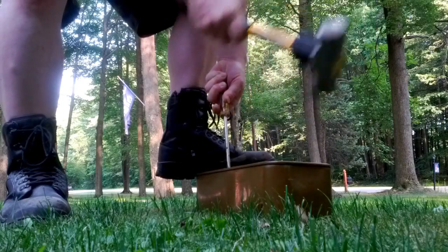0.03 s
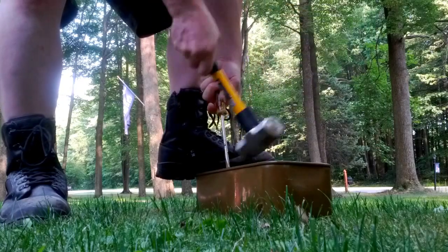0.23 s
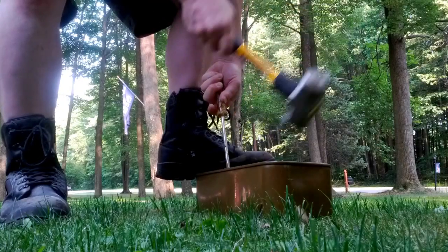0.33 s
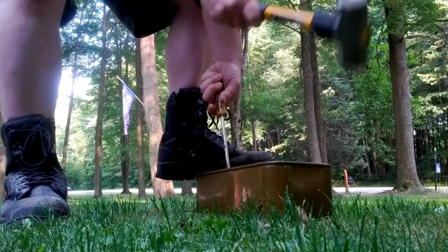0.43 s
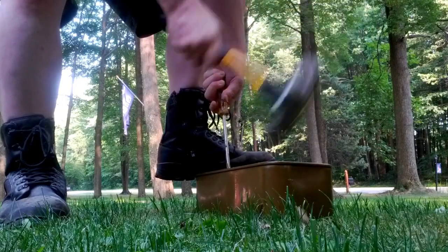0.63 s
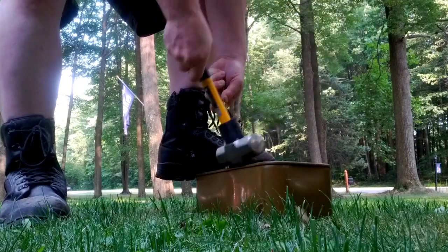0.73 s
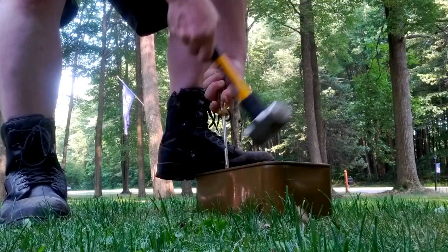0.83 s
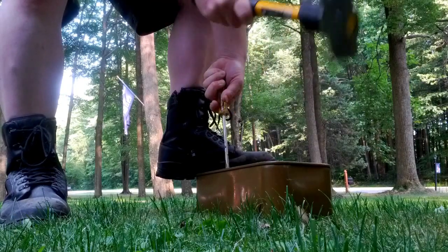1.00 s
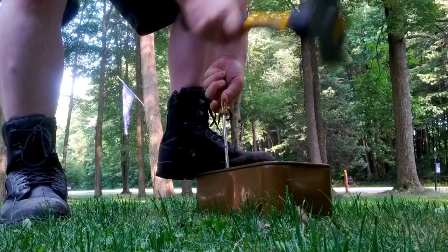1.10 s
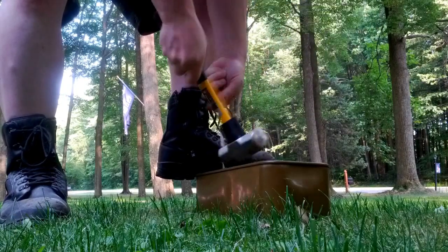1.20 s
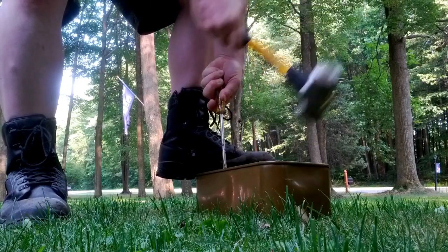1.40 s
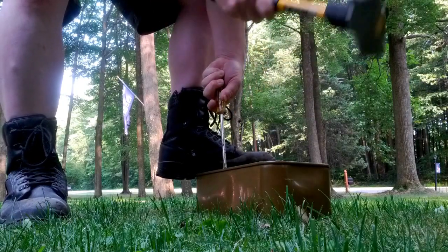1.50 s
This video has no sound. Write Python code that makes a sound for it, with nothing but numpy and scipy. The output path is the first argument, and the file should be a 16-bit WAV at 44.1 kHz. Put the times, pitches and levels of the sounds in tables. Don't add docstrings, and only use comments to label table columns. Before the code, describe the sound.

Hammer blows drive a screwdriver into a metal can lid, three loud overloaded clanks echoing outdoors

```python
import sys
import numpy as np
from scipy import signal
from scipy.io import wavfile
from scipy.ndimage import uniform_filter1d

SR = 44100
rng = np.random.default_rng(int(sys.argv[2]) if len(sys.argv) > 2 else 0)


def unload_audio(sound):
    columns = np.transpose(np.atleast_2d(sound))
    steps = np.round(np.clip(columns, -1, 1) * 32767)
    wavfile.write(sys.argv[1], SR, steps.astype(np.int16))


def how_loud(loudness_db):
    steps = np.asarray(loudness_db, float) / 20
    return 10 ** steps


N = 68355


def evened(x):
    return x / np.sqrt(np.mean(x ** 2) + 1e-20)


def read(points, hz):
    f, value = np.transpose(points)
    return np.interp(np.log(hz + 1), np.log(f + 1), value)


def add(mix, start_s, sound):
    part = mix[round(start_s * SR):][:len(sound)]
    part += sound[:len(part)]


def resonate(x, hz, width_hz):
    turn = np.exp(2j * np.pi * hz * np.arange(len(x)) / SR)
    r = np.exp(-np.pi * width_hz / SR)
    return 2 * (turn * signal.lfilter([1 - r], [1, -r], x / turn)).real


def resonate_twice(x, hz, width_hz):
    return resonate(resonate(x, hz, width_hz), hz, width_hz)


# pitch_hz, width_hz, level_db
STEEL_MODES = [
    [(4090, 210, 2.5), (6406, 390, 13), (8300, 180, -13), (9860, 101, -24), (12200, 590, -2.5),
     (12700, 296, -31.5), (14450, 880, -41)],
    [(4160, 480, 2.5), (6000, 610, 0), (7270, 498, 12), (7450, 210, -2.5), (8450, 230, 2),
     (8900, 280, -25.5), (12700, 960, 5.5)],
    [(4316, 200, -7), (5630, 660, -1.5), (7345, 510, -1), (9210, 610, -22), (10200, 134, -18),
     (12824, 270, 3), (16020, 178, -1)],
]
CONTACT_S, CRACK_T60_S, CRACK_HISS_DB = 0.0018, 0.012, -1.5
SIZZLE_DB, SIZZLE_T60_S, CRACK_TOP_HZ = -19, 0.045, 14900


def crack(crack_db, modes):
    t = np.arange(4000) / SR
    grit, hiss = rng.standard_normal((2, 4000))
    drive = grit * (np.exp(-t / CONTACT_S) + how_loud(SIZZLE_DB - 60 * t / SIZZLE_T60_S))
    ring = sum(how_loud(level_db) * resonate(drive, hz, width_hz) / np.sqrt(width_hz)
               for hz, width_hz, level_db in modes)
    snap = np.diff(hiss, prepend=0) * how_loud(CRACK_HISS_DB - 60 * t / CRACK_T60_S)
    snap += hiss * how_loud(-23 - 60 * t / 0.13)
    top = signal.butter(3, CRACK_TOP_HZ, fs=SR, output="sos")
    return how_loud(crack_db) * signal.sosfilt(top, ring / abs(ring).max() + snap / 2)


# pitch_hz, level_db, t60_s
LID_MODES = [
    [(109.6, -15, 0.058), (181.6, -10, 0.06), (318.6, -23, 0.12), (454.3, 2.5, 0.035), (587, -12.5, 0.034),
     (699, -12.5, 0.065), (832, 1.5, 0.014), (980, -15.5, 0.07), (1099, -9.5, 0.031), (1381, 3.5, 0.03),
     (1467, -15, 0.047), (1774, -20, 0.031), (2160, -18.5, 0.033)],
    [(76, -21, 0.096), (271, -14.5, 0.081), (442.3, 4.5, 0.018), (525, -1, 0.034), (641, 5.5, 0.026),
     (768.6, -0.5, 0.035), (879.4, -3.5, 0.041), (1029, -4, 0.03), (1189.5, -5.5, 0.038), (1371, 1, 0.025),
     (1458, -9.5, 0.066), (1648, -11, 0.038), (1853, -10, 0.045), (2145, -14.5, 0.029)],
    [(184.5, -10.5, 0.0354), (315, -7.5, 0.039), (437, 6, 0.016), (632.5, 4, 0.027), (766, -10, 0.07),
     (837, -0.5, 0.022), (996, -4, 0.03), (1241, -3, 0.032), (1378, -7.5, 0.026), (1523, -8.5, 0.046),
     (1770, -17.5, 0.056), (2236, -10, 0.021), (63, -15.5, 0.085)],
]
BUCKLE_DB, BUCKLE_HZ, BUCKLE_WIDTH_HZ, BUCKLE_T60_S = -10.5, 1640, 2300, 0.048


def lid(lid_db, hold_s, rise_s, modes, detune=0, shorter=1):
    t = np.arange(6000) / SR
    late_s = (np.sqrt(t ** 2 + hold_s ** 2) - hold_s) / shorter
    shift = 1 + detune * rng.uniform(-0.81, 1, size=14)
    ring = np.zeros(6000)
    for k, (hz, level_db, t60_s) in enumerate(modes):
        ring += (-1) ** k * how_loud(level_db - 60 * late_s / t60_s) * np.sin(2 * np.pi * hz * shift[k] * t)
    buckle = evened(resonate_twice(rng.standard_normal(6000), BUCKLE_HZ, BUCKLE_WIDTH_HZ))
    buckle *= how_loud(BUCKLE_DB - 60 * t / BUCKLE_T60_S / shorter)
    return (1 - np.exp(-t / rise_s)) * how_loud(lid_db) * (ring / 2 + buckle)


# from_hz, to_hz, climb_s, level_db, t60_s
DENT_NOTES = [
    (443, 615, .014, -5, 0.039),
    (470, 859, .016, -7, 0.0687),
    (419, 925, 0.01226, -6, 0.04),
]


def dent(from_hz, to_hz, climb_s, level_db, t60_s):
    t = np.arange(3000) / SR
    hz = from_hz + (to_hz - from_hz) * np.minimum(t / climb_s, 1)
    fade_db = -60 * t / t60_s - 60 * np.maximum(t - climb_s, 0) / 0.02
    rise = np.minimum(t / 0.0026, 1)
    return rise * how_loud(level_db + fade_db) * np.sin(2 * np.pi * np.cumsum(hz) / SR)


# delay_s, level_db re the blow
REBOUNDS = [
    [(.0095, -8.5), (.020, -26.5), (.046, -34)],
    [(.013, -7), (.029, -39), (.043, -26)],
    [(.009, -10.5), (.022, -39), (.043, -38)],
]


def rebounds(mix, start_s, lid_db, modes, bounces):
    for delay_s, weaker_db in bounces:
        stroke = lid(lid_db + weaker_db, hold_s=0.0041, rise_s=0.0023, modes=modes, detune=0.06, shorter=0.51)
        add(mix, start_s + delay_s, stroke)


# start_s, level_db, pitch_hz, t60_s
RATTLES = [(0.2215, -16, 9650, 0.014), (.2513, -25, 11000, 0.0037), (0.757, -8, 7700, 0.0099),
           (0.761, -6, 8700, 0.005), (0.7884, -16, 11500, 0.0078), (1.2753, -11, 8100, 0.019),
           (1.279, -15, 8800, 0.0093), (1.3010, -16, 13600, 0.0074), (1.3063, -10.5, 12300, 0.0097),
           (.449, -40, 9000, 0.0066)]


def rattle(level_db, hz, t60_s):
    t = np.arange(1000) / SR
    tick = evened(resonate_twice(rng.standard_normal(1000), hz, 1900))
    return tick * np.minimum(t / 0.001, 1) * how_loud(level_db - 60 * t / t60_s)


# delay_s, spread_s, level_db over the wash
SLAPS = [
    (.047, 0.007, 8),
    (0.0454, 0.0048, 10),
    (0.045, 0.0062, 9.5),
]
# pitch_hz, level_db per Hz
WASH_COLOURS = [
    [(120, -3), (250, -22), (700, -7.5), (1420, -17), (2140, -22), (5200, -26), (12000, -14), (15500, -32)],
    [(120, -22), (250, -6.5), (600, -2.5), (1300, -10), (2180, -20), (5910, -27), (11000, -17.5),
     (15500, -26.5)],
    [(120, -3.5), (300, -8), (600, -4), (1300, -10), (2760, -19.5), (6770, -18.5), (13700, -10.5),
     (15200, -29)],
]
WASH_DB = [-27.5, -23.5, -26]
# pitch_hz, t60_s
WASH_T60 = [(200, 0.52), (700, 0.33), (2000, 0.33), (6000, 0.41), (14000, 0.25)]
# pitch_hz, width_hz, lift_db
WASH_RINGS = [
    [(740, 350, 1.5), (1380, 500, 3), (4000, 540, 5.5), (6250, 810, 7.5), (10000, 1300, 1.5)],
    [(950, 540, 3), (2300, 406, 0.5), (4200, 400, 4), (7400, 1120, 5), (9320, 1100, 4.5)],
    [(520, 260, 1), (1020, 360, 2), (3960, 970, 5), (5700, 500, 4), (7800, 1000, 5.5)],
]
FAR_DB, FAR_SLOWER = -14.5, 3.54
PATCH_DB, LOW_PATCH_DB, RING_LONGER_PER_DB = 1.13, 0.6, 0.025


def trees(wash_db, colour, slap, rings):
    hz = np.fft.rfftfreq(256, 1 / SR)[:, None]
    t = np.arange(640) * 64 / SR
    a, b, patches = rng.standard_normal((640, 129, 3)).T
    noise = a + 1j * b
    unit = signal.istft(noise, nperseg=256, noverlap=192)[1].std()
    patches = evened(uniform_filter1d(uniform_filter1d(patches, 6, 0), 6, 1))

    lift_db = sum(lift * np.exp(-2 * ((hz - f) / width_hz) ** 2) for f, width_hz, lift in rings)
    tone = how_loud(read(colour, hz) + lift_db)
    tone = tone / np.sqrt(np.mean(tone ** 2))

    fall_db = -60 * t / read(WASH_T60, hz) / (1 + RING_LONGER_PER_DB * lift_db)
    delay_s, spread_s, slap_db = slap
    bump_db = slap_db * np.exp(-0.5 * ((t - delay_s) / spread_s) ** 2)
    shape = how_loud(fall_db + bump_db) + how_loud(FAR_DB + fall_db / FAR_SLOWER)
    shape = shape * how_loud((PATCH_DB + LOW_PATCH_DB * (hz < 1600)) * patches)

    wash = signal.istft(noise * tone * shape, nperseg=256, noverlap=192)[1] / unit
    wash = signal.sosfilt(signal.butter(2, 150, "high", fs=SR, output="sos"), wash)
    return how_loud(wash_db) * wash * np.minimum(np.arange(len(wash)) / SR / 0.0059, 1)


# start_s, level_db, pitch_hz, length_s
RETURNS = [(0.22, -19.5, 606, 0.0091), (.246, -27.5, 749, 0.02), (.25, -31.5, 1444, 0.013),
           (0.281, -36.5, 730, 0.013), (.30, -37.5, 680, 0.015), (0.332, -42, 740, 0.013),
           (0.773, -24, 1060, 0.0047), (.784, -25.5, 750, 0.01), (0.785, -29, 520, 0.017),
           (.794, -24, 980, 0.0084), (0.816, -31.5, 930, 0.026), (.822, -33.5, 470, 0.024),
           (0.861, -38.5, 562, 0.012), (0.932, -38, 505, 0.016), (1.276, -17.5, 440, 0.013),
           (1.301, -26.5, 315, .016), (1.304, -28, 1065, 0.014), (1.321, -23, 950, 0.011),
           (1.331, -34, 542, 0.027), (1.371, -39.5, 513, 0.026)]


def comeback(level_db, hz, length_s):
    t = np.arange(2000) / SR
    blur = 1 + 0.56 * evened(resonate_twice(rng.standard_normal(2000) + 0j, 0, 250))
    lump = np.sin(np.pi * np.minimum(t / length_s, 1) ** 0.73)
    return how_loud(level_db) * blur * lump * np.sin(2 * np.pi * hz * t)


# pitch_hz, width_hz, level_db
DRONES = [(122, 33, -57.5), (226.3, 24, -58), (710, 210, -65), (1501, 132, -62.5), (2737, 92, -70),
          (5810, 260, -71.5)]
HUM_HZ, HUM_DB, HUM_WAVER_DB = 118.6, -46.5, -4


def far_machine():
    waver = evened(resonate(rng.standard_normal(N), 0, 6.4))
    out = how_loud(HUM_DB + HUM_WAVER_DB * waver) * np.sin(2 * np.pi * HUM_HZ * np.arange(N) / SR)
    for hz, width_hz, level_db in DRONES:
        out += how_loud(level_db) * evened(resonate_twice(rng.standard_normal(N), hz, width_hz))
    return out


# pitch_hz, level_db per Hz
AIR_COLOUR = [(12, -71.5), (20, -11.5), (86, -7), (120, -15.5), (150, -16), (388, -24), (472, -24),
              (2750, -40), (16000, -42)]
AIR_DB = -46.5


def air():
    frames, hz = N // 512 + 6, np.fft.rfftfreq(2048, 1 / SR)
    a, b, patches = rng.standard_normal((frames, 1025, 3)).T
    patches = evened(uniform_filter1d(uniform_filter1d(patches, 20, 0), 5, 1))
    z = (a + 1j * b) * how_loud(read(AIR_COLOUR, hz)[:, None] + 1.6 * patches)
    return how_loud(AIR_DB) * evened(signal.istft(z, nperseg=2048, noverlap=1536)[1][:N])


# start_s, crack_db, lid_db, hold_s, rise_s
BLOWS = [
    (0.2053, 10, 4.5, 0.0052, 0.0021),
    (0.7438, 12.5, 5, 0.0079, 0.00067),
    (1.2619, 14, 3.5, 0.0061, 0.0017),
]


def scene():
    mix = air() + far_machine()
    for k, (start_s, crack_db, lid_db, hold_s, rise_s) in enumerate(BLOWS):
        add(mix, start_s, crack(crack_db, STEEL_MODES[k]))
        add(mix, start_s, lid(lid_db, hold_s, rise_s, LID_MODES[k]))
        add(mix, start_s, dent(*DENT_NOTES[k]))
        rebounds(mix, start_s, lid_db, LID_MODES[k], REBOUNDS[k])
        add(mix, start_s, trees(WASH_DB[k], WASH_COLOURS[k], SLAPS[k], WASH_RINGS[k]))
    for start_s, *tick in RATTLES:
        add(mix, start_s, rattle(*tick))
    for start_s, *lump in RETURNS:
        add(mix, start_s, comeback(*lump))
    return mix[None]


# start_s, end_s, above_hz, depth 0-1
HUSHES = [(.728, .7395, 1500, 1), (1.240, 1.2545, 2200, 1), (.24, .39, 14500, .6), (.78, .95, 15200, .5),
          (1.37, 1.47, 14900, .9)]


def hush(x):
    t = np.arange(N) / SR
    for start_s, end_s, above_hz, depth in HUSHES:
        taps = signal.firwin(191, above_hz, window=("kaiser", 6), fs=SR)
        low = signal.oaconvolve(x, taps[None], "same")
        mute = depth * np.clip(np.minimum(t - start_s, end_s - t) / 0.002, 0, 1) ** 0.5
        x = x + mute * (low - x)
    return x


def low_pass(x):
    return signal.sosfilt(signal.butter(12, 16530, fs=SR, output="sos"), x)


def record(dry):
    overloaded = np.clip(dry, -1.05, 1.05)
    edge = signal.ellip(12, 0.5, 70, 15740, fs=SR, output="sos")
    limited = np.clip(signal.sosfilt(edge, overloaded), -1, 1)
    return low_pass(hush(limited))


dry = scene()
out = record(dry)
unload_audio(out)
```